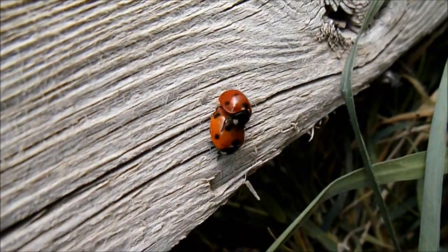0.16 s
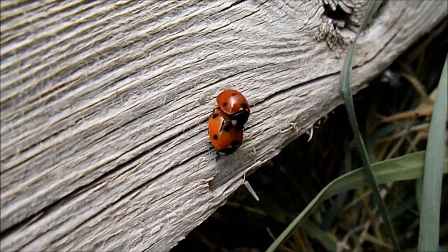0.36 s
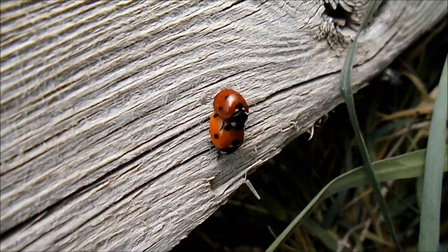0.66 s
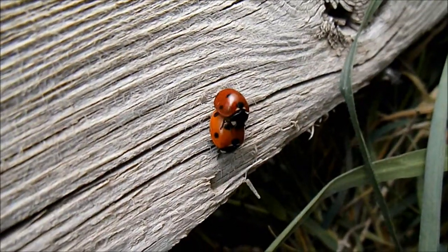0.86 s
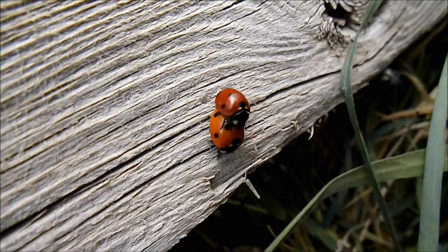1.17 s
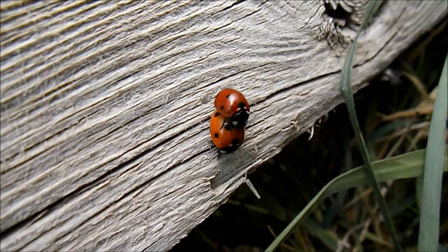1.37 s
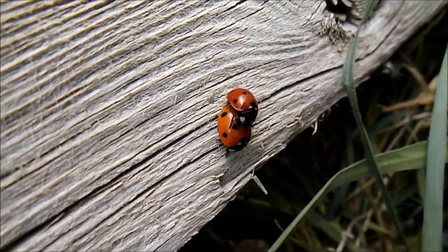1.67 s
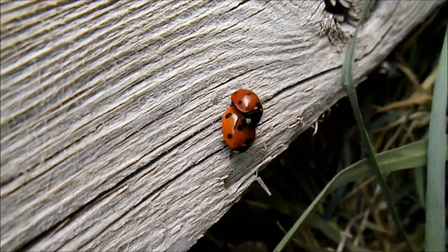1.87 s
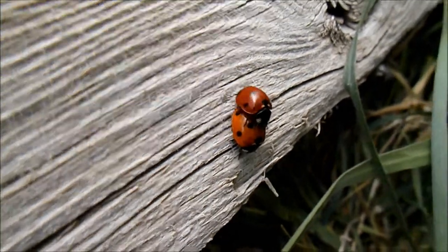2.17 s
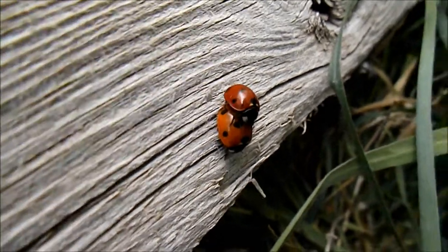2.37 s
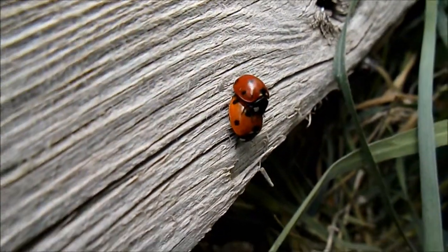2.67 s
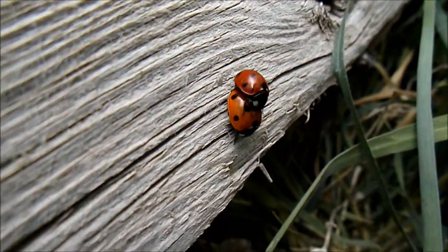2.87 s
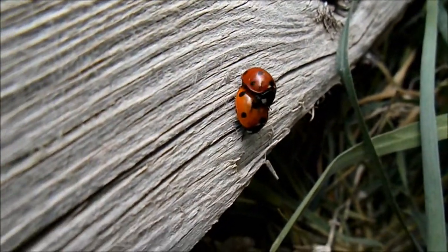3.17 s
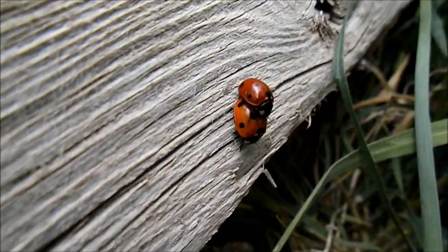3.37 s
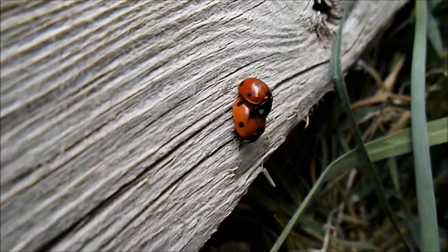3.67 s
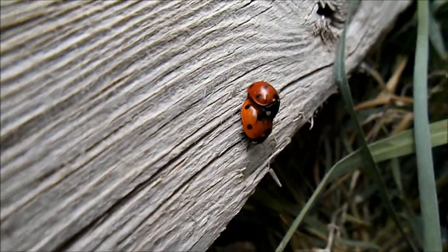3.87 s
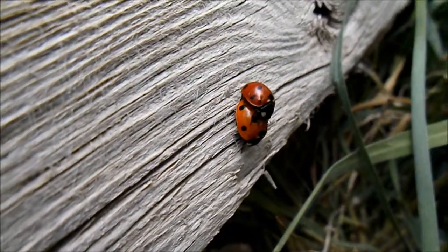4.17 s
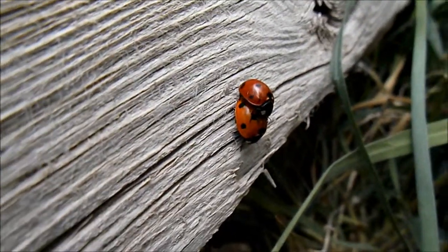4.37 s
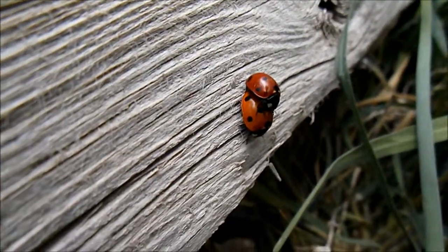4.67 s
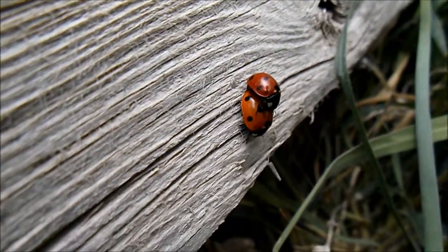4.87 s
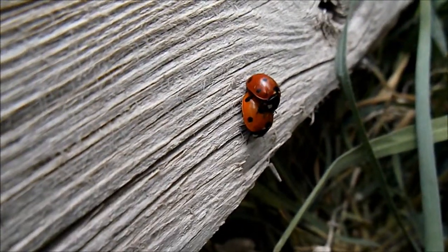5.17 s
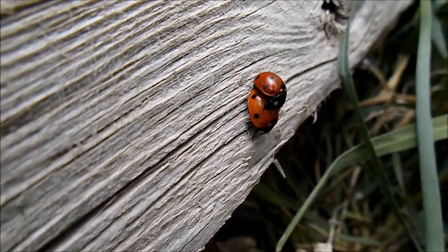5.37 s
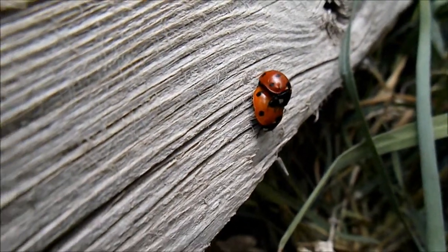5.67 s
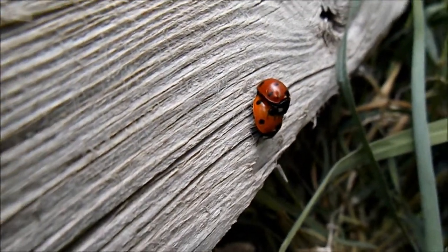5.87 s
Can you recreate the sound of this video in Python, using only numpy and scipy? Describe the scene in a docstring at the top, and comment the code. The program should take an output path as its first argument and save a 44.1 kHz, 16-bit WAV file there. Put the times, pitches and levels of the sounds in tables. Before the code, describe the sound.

A quick run of sharp plastic snaps from a small camera's dial or button sounds right at the microphone. Light ticks and soft finger scuffs on the housing follow, with one single snap, then a second, longer run of snaps and more small ticks. Sparrows chirp faintly some way off throughout, with a slight echo and a thin whistle near the end. It is a quiet garden under soft hiss.

```python
"""Sharp plastic snaps come in quick runs as a dial or button clicks on a small camera, close to a log
in a garden. Each snap makes the housing ring, and the housing ticks and creaks under the fingers.
Sparrows chirp and whistle some way off, their sliding notes echoing among walls. Behind it all a low
drone fades away and a breathy band of noise throbs under the microphone's hiss."""
import sys
import numpy as np
from scipy import signal
from scipy.fft import rfft, irfft, next_fast_len
from scipy.io import wavfile
from scipy.ndimage import uniform_filter1d, map_coordinates

SR = 44100
rng = np.random.default_rng(int(sys.argv[2]) if len(sys.argv) > 2 else 0)


def wrap_up_sound(samples):
    """Save the sound to the file named by the first command line argument, as 16-bit audio."""
    columns = np.atleast_2d(samples).T
    # keep every value between -1 and 1, then stretch to whole-number steps
    tamed = np.clip(columns, -1, 1)
    steps = np.round(tamed * 32767).astype(np.int16)
    wavfile.write(sys.argv[1], SR, steps)


N = 265041

# Snaps and their rebounds. Each row: start in seconds, body level in dB, extra dB for the dull ring,
# body pitch in Hz, bright pitch in Hz, bright level in dB, level of the highest (airy) ring in dB.
SNAPS = [(0.0556, -21.5, 6, 2857, 6916, -20.5, -23.5), (0.058, -26, 9.5, 2970, 5740, -32, -38),
         (0.1554, -18.5, 2.5, 2949, 6754, -21, -18), (0.156, -31, 1, 2935, 5720, -21.5, -39.5),
         (.1590, -27, 6, 2740, 5996, -41.5, -44), (0.2302, -11.5, 1.5, 2864, 6750, -6, -35.5),
         (0.232, -22.5, 1, 2915, 6330, -33.5, -26), (2.0504, -36.5, 7.5, 3350, 8296, -11.5, -26),
         (3.69, -23, -0.5, 2975, 6770, -19.5, -22), (3.6914, -13.5, -4.5, 2772, 6650, -26.5, -36.5),
         (3.6966, -43.5, -0.5, 2920, 6660, -37, -53), (3.7663, -40.5, -2, 2830, 7240, -16.5, -24.5),
         (3.7670, -7, -4, 2724, 5137, -23, -19.5), (3.7714, -27, 7.5, 2960, 6885, -20, -22.5),
         (3.8562, -16, 0, 2925, 7160, -20, -23), (3.8609, -22, 1, 2906, 7013, -13, -23),
         (3.9562, -15.5, -1, 2866, 7710, -16.5, -21), (3.9610, -17.5, 3.5, 2930, 6690, -15.5, -20),
         (4.0296, -11.5, 3.5, 2967, 7144, -12, -21), (4.0321, -15, 0, 2882, 5785, -19, -33.5),
         (4.036, -22.5, -6.5, 2937, 7121, -21, -24)]
# Modes, the tones the housing rings at. Each row: pitch as a multiple of the body pitch, level in dB,
# seconds to fade by 60 dB, seconds to rise.
BODY_MODES = [(0.79, -12.5, 0.00915, 0.000965), (0.89, -4.5, 0.00602, 0.00063),
              (0.983, -3, 0.0088, 0.00054), (0.998, -15.5, 0.0219, 0.00109),
              (1.13, -15.5, 0.0111, 0.000197)]
# Its lowest and highest modes. Each row: as above, but with the pitch in Hz.
DULL_MODES = [(413, -11.5, 0.0183, 0.00085), (517, -6.5, 0.0165, 0.000675), (742, -6, 0.0173, 0.00058),
              (986, -7.5, 0.0111, 0.00052), (1249, -3.5, 0.0175, 0.0008), (1536, -13, 0.0099, 0.00102),
              (1776, 1, 0.0144, 0.00072)]
AIR_MODES = [(10720, -5, 0.0054, 0.00013), (12010, -7.5, 0.0063, 0.00003), (13620, -13.5, 0.004, 0.000127),
             (14440, -9, 0.007, 0.000168)]
# Small dull knocks. Each row: start in seconds, pitch in Hz, peak level in dB.
KNOCKS = [(2.077, 3600, -41.5), (2.101, 716, -39), (2.13, 3457, -30), (2.358, 2700, -44.5),
          (4.336, 953, -40.5), (5.1345, 3600, -36), (5.161, 1887, -42.5), (5.231, 950, -49.5),
          (5.8456, 3330, -43.5)]
# The louder ticks. Each row: start in seconds, peak level in dB, bright pitch in Hz,
# level of the low part in dB relative to that peak.
TICKS = [(1.7507, -37, 6200, -8), (1.931, -36.5, 7787, -3), (2.076, -40, 7240, -1.5),
         (2.103, -33.5, 9270, -15), (2.1292, -38.5, 6086, -8.5), (2.2352, -31, 6900, -9.5),
         (2.4314, -40, 7600, -14.5), (2.6164, -39.5, 6402, -14), (2.816, -38, 6355, 0),
         (2.831, -37, 6422, -2), (3.264, -39, 6800, 1.5), (3.4378, -42, 9365, -14.5),
         (3.5332, -34, 10050, -24), (4.5419, -29, 7800, -3.5), (5.134, -44, 7254, 3.5),
         (5.1872, -38.5, 6223, -17), (5.226, -38, 7584, -25), (5.2925, -30.5, 8400, -23),
         (5.4596, -31, 7140, -3), (5.4977, -39.5, 7645, -16.5), (5.6021, -33, 6420, -0.5),
         (5.655, -34, 7640, -11), (5.671, -34.5, 6934, -5.5), (5.737, -33.5, 6189, -23.5),
         (5.7872, -34, 6500, 0.5), (5.8468, -34.5, 6450, 0), (5.876, -38.5, 6360, -22),
         (5.9251, -34.5, 6020, -6.5), (5.9743, -36, 6927, -10.5)]
# Fingertip scuffs. Each row: start in seconds, length in seconds, level in dB, upper edge in Hz.
SCUFFS = [(0.612, 0.024, -75, 1500), (1.365, 0.108, -51.5, 3130), (1.553, 0.0397, -50, 3200),
          (2.079, 0.044, -44.5, 13010), (3.862, 0.033, -42.5, 9000), (4.32, 0.026, -65.5, 1500),
          (5.443, 0.08, -63.5, 9010), (5.559, 0.118, -47, 9300)]
# How strongly the fingers shift. Each row: time in seconds, level in dB.
GRIP = [(0, -58), (1.3, -59), (1.72, -57), (1.77, -53.5), (2.0, -54.5), (2.4, -54), (2.5, -58), (3.16, -56),
        (3.38, -58), (3.65, -54), (3.85, -57.5), (4.5, -60), (5.08, -60), (5.2, -55.5), (5.42, -58),
        (5.47, -51.5), (5.66, -53.5), (6.01, -56)]
# Sparrow chirps: a high raspy onset, a quick drop to a "knee", then a slow slide. Each row: start in
# seconds, onset pitch, knee pitch and end pitch in Hz, level in dB, dB taken off the onset.
CHIRPS = [(.315, 4883, 3756, 3050, -57.5, -0.5), (1.013, 5080, 3622, 3100, -57, 5),
          (1.764, 4880, 3700, 3095, -57, 1.5), (2.48, 4970, 3694, 3201, -55.5, 2.5),
          (2.939, 4895, 3767, 3100, -55.5, 0.5), (3.455, 4890, 3634, 3040, -55.5, 0),
          (4.125, 4878, 3800, 3135, -56, -2.5), (4.915, 4070, 4190, 2893, -60, -3),
          (5.45, 4815, 3595, 3050, -56, 5)]
# Thin clear whistles. Each row: as for a chirp, with the length in seconds after the start.
WHISTLES = [(5.655, 0.29, 5660, 5584, 5540, -56, -5), (5.965, 0.0418, 5290, 5270, 4910, -58.5, -1)]
# A second sparrow's burry cheeps, and faint far twitters.
# Each row: start and length in seconds, first and last pitch in Hz, level in dB.
CHEEPS = [(0, 0.075, 4530, 4437, -55), (.905, 0.125, 4455, 4518, -59.5), (.92, 0.088, 4155, 4140, -60),
          (1.86, 0.076, 4560, 4520, -56), (2.775, 0.087, 4510, 4550, -56.5), (2.83, 0.041, 4800, 4910, -61),
          (3.632, 0.055, 4556, 4480, -50.5), (4.475, 0.062, 4140, 4230, -61),
          (4.5, 0.087, 4560, 4560, -57.5)]
TWITTERS = [(.7, 0.026, 5300, 4690, -65), (.735, 0.016, 5600, 4850, -58.5), (.78, .03, 5800, 4855, -60.5),
            (1.18, 0.022, 5250, 5070, -63.5), (1.22, 0.026, 4800, 4580, -62),
            (1.27, 0.019, 3780, 3606, -64.5), (1.52, 0.03, 5000, 4190, -62.5),
            (1.57, 0.0286, 5400, 4510, -57.5)]
# The pitches a bird's voice carries best: centre in Hz, width in Hz, boost in dB.
THROAT = (3370, 456, 5.2)
# The echo among the walls. Each row: frequency in Hz, seconds to fade by 60 dB.
WALL_DECAY = [(2500, 0.17), (4000, 0.575), (6000, 0.688)]
# Dense echoes from the nearest walls: seconds they last, then the step down in dB.
NEAR_WALLS = (0.115, -12)
# Swells of the breathy band. Each row: start in seconds, length in seconds, level in dB.
THROBS = [(0.616, 0.0288, -49), (1.384, 0.026, -54), (1.515, 0.0218, -51), (1.583, 0.0487, -51),
          (2.151, 0.0875, -58), (2.27, 0.0435, -55.5), (2.356, 0.029, -58), (2.449, 0.0337, -51.5),
          (2.491, 0.024, -51.5), (2.609, 0.0226, -46.5), (2.651, 0.0223, -51), (2.754, 0.0545, -54),
          (2.955, 0.0898, -53.5), (3.279, 0.061, -57), (3.455, 0.0384, -55.5), (3.738, 0.029, -58),
          (3.862, 0.072, -57.5), (4.159, 0.0837, -57.5), (4.331, 0.0274, -48.5), (4.517, 0.03, -60),
          (4.549, 0.043, -61.5), (4.817, 0.0325, -57.5), (4.879, 0.0326, -60), (5.051, 0.0145, -50.5),
          (5.197, 0.036, -61), (5.306, 0.0144, -55), (5.338, 0.0194, -50), (5.464, 0.1655, -55),
          (5.896, 0.1024, -53.5)]
# The drone's tones. Each entry: pitch in Hz.
DRONE_HZ = [318.6, 351.6, 364.9, 401.8, 423.2]
# The hum's tones. Each row: pitch in Hz, level in dB.
HUM_TONES = [(72, -83.5), (242, -74.5)]
# The tone colour of the hiss. Each row: frequency in Hz, relative level in dB.
HISS_SHAPE = [(15, -60.5), (25, -27), (177, -8), (457, -0.5), (746, 1), (927, -1), (1150, -6.5),
              (2200, -13), (4500, -13), (5570, -17.5), (9500, -15.5), (12000, -18), (15000, -21.5),
              (15700, -59), (16500, -67.5)]
# Faint steady bands, perhaps the camera's own works. Each row: centre and width in Hz, dB over the hiss.
HISS_BANDS = [(1857, 71, 5.5), (2752, 421, 8), (3434, 161, 8.5), (5020, 158, 3), (6387, 730, 8.5),
              (7525, 456, 9), (8680, 384, 8.5), (10583, 554, 7.5)]


def snaps():
    """Each snap strikes the housing: the bright modes speak at once, the body modes swell in after."""
    out, t = np.zeros(N), np.arange(SR // 30) / SR
    for start, body_db, dull_db, body_hz, hz, bright_db, air_db in SNAPS:
        bright_modes = [(hz, 0, .006, .0003), (0.9335 * hz, -3, .008, .0003),
                        (0.7872 * hz, -11, .006, .0003), (1.056 * hz, -8, .004, .0003),
                        (1.1466 * hz, -4, .005, .0003)]
        body_modes = [(ratio * body_hz, db, fade, rise) for ratio, db, fade, rise in BODY_MODES]
        crack = band(rng.standard_normal(len(t)), 1212, 8440)
        crack *= amp(-60 * t / 0.02246) * (1 - np.exp(-t / 0.00069))
        body = ring(body_modes, spread_db=1.5) + amp(dull_db - 19) * ring(DULL_MODES) + 0.383 * crack
        treble = amp(bright_db) * ring(bright_modes) + amp(air_db) * ring(AIR_MODES)
        add(out, start, amp(body_db) * body + treble)
    return out


def ring(modes, spread_db=2):
    """One blow on the housing, scaled to a peak of 1: each mode rings at a new strength and phase."""
    t = np.arange(SR // 30) / SR
    blow = np.zeros(len(t))
    for hz, db, fade_s, rise_s in modes:
        shape = amp(db + spread_db * rng.normal() - 60 * t / fade_s) * (1 - np.exp(-t / rise_s)) ** 2
        blow += shape * np.sin(2 * np.pi * (hz * t + rng.random()))
    return blow / np.abs(blow).max()


def knocks():
    """Small dull knocks: two modes that die away in about a dozen vibrations."""
    out = np.zeros(N)
    for start, hz, db in KNOCKS:
        fade_s = 12.2 / hz
        add(out, start, amp(db) * ring([(hz, 0, fade_s, .0003), (1.182 * hz, -4, fade_s, .0003)]))
    return out


def ticks(faint_count=40):
    """Plastic slips with a brief crack in three bands; chance ticks crowd where the grip is strong."""
    out, t = np.zeros(N), np.arange(SR // 50) / SR
    events = [(*row, -42) for row in TICKS]  # listed ticks share one airy level, in dB
    crowding = np.cumsum(amp(curve(GRIP)) ** 4)
    starts = np.searchsorted(crowding, crowding[-1] * rng.random(size=faint_count)) / SR
    for start in starts:
        level_luck, pitch_luck, low_luck = rng.standard_normal(3)
        db = np.interp(start, *np.transpose(GRIP)) + 10.5 - 3.5 * level_luck
        hz = 7240 * (1 + 0.16 * np.tanh(pitch_luck))
        events.append((start, db, hz, -7.5 + 4 * low_luck, db - 0.5))
    for start, db, hz, low_db, air_db in events:
        crack = rng.standard_normal((3, len(t))) * amp(-60 * t / 0.012) * (1 - np.exp(-t / 0.00142))
        parts = (band(crack[0], 2790, 4580), band(crack[1], 0.786 * hz, 1.264 * hz),
                 band(crack[2], 10240, 12600))
        low, bright, air = (part / np.abs(part).max() for part in parts)
        add(out, start, amp(db) * (amp(low_db) * low + bright) + amp(air_db + 2.4 * rng.normal()) * air)
    return out


def scuffs():
    """A fingertip rubs the housing: rough noise that rises fast and fades slowly."""
    out = np.zeros(N)
    for start, length, db, top_hz in SCUFFS:
        progress = np.linspace(0, 1, round(length * SR))
        size = len(progress)
        rub = band(rng.standard_normal(size), 1400, top_hz) * amp(2.15 * wobble(189, size))
        add(out, start, amp(db) * unit(rub) * np.minimum(8 * progress, 1) * (1 - progress))
    return out


def creak(slips_per_s=300, steady_db=-59):
    """Many tiny slips under the fingers make a grainy hiss that follows the grip."""
    kicks = (rng.random(N) < slips_per_s / SR) * amp(np.minimum(4 * rng.exponential(size=N), 11))
    t = np.arange(SR // 40) / SR
    grain_power = np.abs(signal.fftconvolve(kicks, amp(-120 * t / 0.072))[:N])
    slips = np.sqrt(grain_power + 0.25) * rng.standard_normal(N)
    treble = lambda f: (peak(f, 6110, 3300) + .5 * peak(f, 10480, 3400)) / (1 + (f / 15200) ** 40)
    high = unit(filtered(slips, treble))
    low = unit(filtered(slips, lambda f: peak(f, 3056, 3200)))
    excess_power = amp(2 * curve(GRIP)) - amp(2 * steady_db)  # what rises over the steady hiss
    return np.sqrt(np.maximum(excess_power, 0)) * (high + amp(-2.5) * low)


def sparrows():
    """Four kinds of call: raspy chirps, burry cheeps, far twitters and clear whistles."""
    chirps = [(start, .095, *rest) for start, *rest in CHIRPS]  # all the same length, in seconds
    glides = lambda rows: [(start, length, hz, hz, end, db, 0) for start, length, hz, end, db in rows]
    return (bird(chirps, knee_at=0.33, warble_hz=141.8, rasp_db=4.5, rasp_rate=400, echo_db=3.5,
                 upper_db=-9)
            + bird(glides(CHEEPS), knee_at=0.21, warble_hz=90, rasp_db=4, rasp_rate=200, echo_db=-7)
            + bird(glides(TWITTERS), knee_at=0.103, warble_hz=262, rasp_db=3, rasp_rate=302, echo_db=-6.5)
            + bird(WHISTLES, knee_at=0.15, warble_hz=15, rasp_db=2.5, rasp_rate=50, echo_db=-6))


def bird(notes, knee_at, warble_hz, rasp_db, rasp_rate, echo_db, upper_db=-60):
    """A bird sings sliding tones, roughened by a fast warble and an uneven level; the walls echo them."""
    out = np.zeros(N)
    throat_hz, throat_width_hz, boost_db = THROAT
    for start, length, onset_hz, knee_hz, end_hz, db, onset_cut_db in notes:
        progress = np.linspace(0, 1, round(length * SR))
        size, drop_hz = len(progress), onset_hz - knee_hz
        onset = 1 / (1 + np.exp((progress - knee_at) / 0.04065))  # 1 in the onset, 0 after the drop
        slide = np.minimum((1 - progress) / (1 - knee_at), 1)
        hz = end_hz + (knee_hz - end_hz) * slide + drop_hz * onset
        hz += warble_hz * wobble(420.9, size)
        hz += .5 * drop_hz * onset * wobble(1513, size)  # fast scatter blurs the onset
        shape = np.sqrt(2 * np.abs(np.sin(np.pi * progress)))
        shape *= amp(-onset_cut_db * onset + rasp_db * wobble(rasp_rate, size))
        shape *= amp(boost_db * np.exp(-((hz - throat_hz) / throat_width_hz) ** 2))
        # After a high onset, a burry second voice rides above the first.
        upper_hz = hz + 841 * (1 - onset) + 341.7 * wobble(900, size)
        note = shape * (tone(hz) + amp(upper_db) * (drop_hz > 0) * tone(upper_hz))
        add(out, start, amp(db) * note)
        add(out, start + .003, amp(db + echo_db) * wall_echo(note))
    return out


def wall_echo(sound):
    """Walls throw back a cluster of near echoes, then a quieter tail in which low pitches die first."""
    hz, t, spectrum = signal.stft(rng.standard_normal(SR // 2), SR, nperseg=256)
    near_s, drop_db = NEAR_WALLS
    late = np.clip((t - near_s) / 0.025, 0, 1)
    decay = amp(-60 * t / along(WALL_DECAY, hz)[:, None] + drop_db * late)
    tail = signal.istft(spectrum * decay, SR, nperseg=256)[1]
    return signal.fftconvolve(sound, tail / np.linalg.norm(tail))


def hiss(level_db=-52.5):
    """Microphone hiss and far town noise, in soft patches, with faint steady bands."""
    spectrum = signal.stft(rng.standard_normal(N), nperseg=512)[2]
    patches = uniform_filter1d(uniform_filter1d(rng.standard_normal(spectrum.shape), 6, 0), 10, 1)
    noise = signal.istft(spectrum * amp(1.624 * unit(patches)), nperseg=512)[1][:N]
    band_power = lambda f: sum(np.abs(amp(db) * peak(f, hz, width)) ** 2 for hz, width, db in HISS_BANDS)
    colour = lambda f: amp(along(HISS_SHAPE, f)) * np.sqrt(1 + band_power(f))
    return amp(level_db) * unit(filtered(noise, colour))


def throb(rest_db=-62.5, growth_db_per_s=0.4136, edge_s=0.0101):
    """A breathy band of noise flutters quietly, with short swells on top."""
    t = np.arange(N) / SR
    breath = unit(filtered(rng.standard_normal(N), lambda f: peak(f, 915.8, 198) ** 2))
    level = amp(rest_db + growth_db_per_s * t + 2 * wobble(16))
    for start, length, db in THROBS:
        level += amp(db) * np.clip(np.minimum(t - start, start + length - t) / edge_s + .5, 0, 1)
    return level * breath


def drone(start_db=-52, fade_db_per_s=12):
    """A low rough drone of wavering tones and noise, fading away."""
    t = np.arange(N) / SR
    tones = unit(sum(tone(hz + 1.54 * wobble(7.03), 2 * np.pi * rng.random()) for hz in DRONE_HZ))
    noise = unit(filtered(rng.standard_normal(N), lambda f: peak(f, 516, 367) ** 2))
    return amp(start_db - fade_db_per_s * t) * unit(tones + 1.32 * noise)


def hum():
    """Two very faint low tones whose levels waver a little."""
    t = np.arange(N) / SR
    return sum(amp(db + 0.38 * wobble(2.36)) * np.sin(2 * np.pi * hz * t) for hz, db in HUM_TONES)


def amp(db):
    """Turn decibels into a number to multiply by."""
    return 10 ** (np.asarray(db) / 20)


def unit(x):
    """Scale a signal to an average power of 1."""
    return x / np.sqrt(np.mean(x ** 2) + 1e-20)


def tone(hz, phase=0):
    """A sine wave that follows a changing pitch."""
    return np.sin(2 * np.pi * np.cumsum(hz) / SR + phase)


def along(points, hz):
    """Read between (Hz, value) points on a log frequency scale."""
    f, values = np.transpose(points)
    return np.interp(np.log(hz + 1), np.log(f + 1), values)


def curve(rows):
    """Join (seconds, value) points into one value per sample."""
    return np.interp(np.arange(N) / SR, *np.transpose(rows))


def wobble(rate, size=N):
    """A smooth curve through `rate` random points a second."""
    return map_coordinates(rng.standard_normal(int(size * rate / SR) + 4), [np.arange(size) * rate / SR])


def filtered(x, response):
    """Multiply each frequency f in x by response(f)."""
    size = next_fast_len(N + SR // 2)
    return irfft(rfft(x, size) * response(np.fft.rfftfreq(size, 1 / SR)), size)[..., :N]


def peak(f, hz, width_hz):
    """A resonance: it favours frequencies near hz."""
    return 1j * f * width_hz / (hz * hz - f * f + 1j * f * width_hz)


def band(x, low_hz, high_hz):
    """Keep mainly what lies between two frequencies."""
    return signal.sosfilt(signal.butter(2, [low_hz, high_hz], btype="band", fs=SR, output="sos"), x)


def add(track, start, sound):
    """Mix a sound in at `start` seconds."""
    part = track[round(start * SR):][:len(sound)]
    part += sound[:len(part)]


def spread(x, mono_hz):
    """Make two channels, the left one sample late; below mono_hz they agree."""
    lag = lambda f: np.pi * f / SR / (1 + (mono_hz / (f + 1)) ** 14)
    return filtered(x, lambda f: np.exp(1j * lag(f) * np.array([[-1], [1]])))


def scene():
    """Mix the camera's noises, the birds and the background in stereo."""
    near = snaps() + knocks() + ticks() + scuffs()
    behind = creak() + sparrows() + hiss() + throb() + drone() + hum()
    low_colour = lambda f: amp(along(HISS_SHAPE, f)) / (1 + (f / 950) ** 16)
    low_hiss = amp(-89.5) * unit(filtered(rng.standard_normal(N), low_colour))
    side_hiss = low_hiss * [[1], [-1]]  # opposite in the two channels
    return spread(near, mono_hz=300) + spread(behind, mono_hz=2740) + side_hiss


def record(dry, top_hz=16800):
    """Give each channel a little treble grain that follows the level, then cut all above top_hz."""
    treble = lambda f: amp(-28) * (f / 8000) ** 1.62 / (1 + (f / 15200) ** 40)
    grain = filtered(np.abs(dry) * rng.standard_normal(dry.shape), treble)
    return filtered(dry + grain, lambda f: f < top_hz)


dry = scene()
out = record(dry)
wrap_up_sound(out)
```